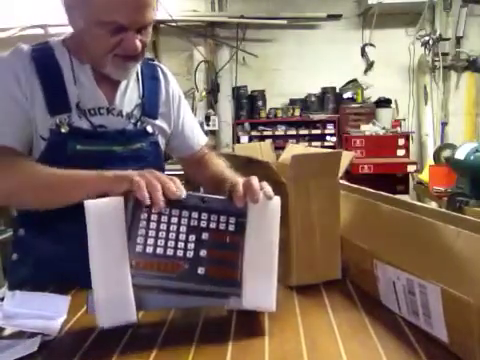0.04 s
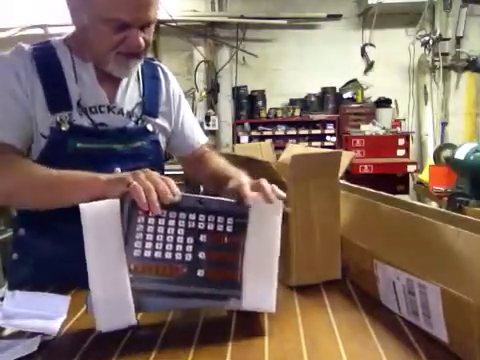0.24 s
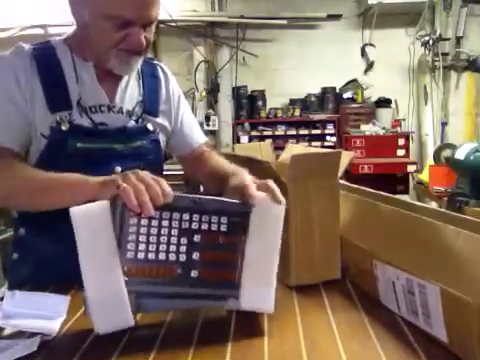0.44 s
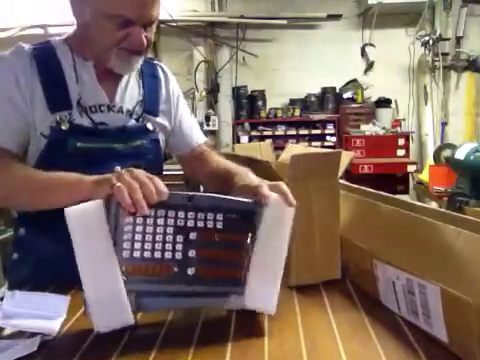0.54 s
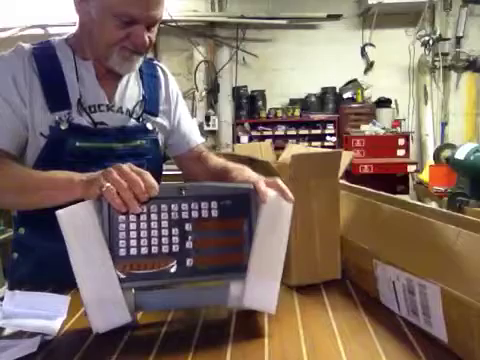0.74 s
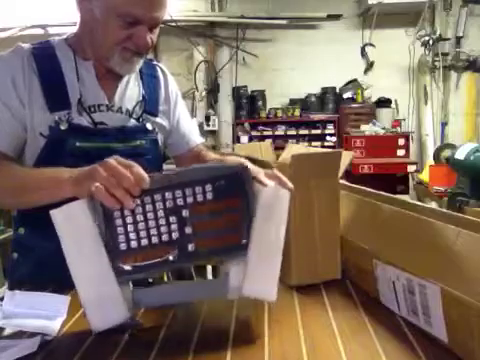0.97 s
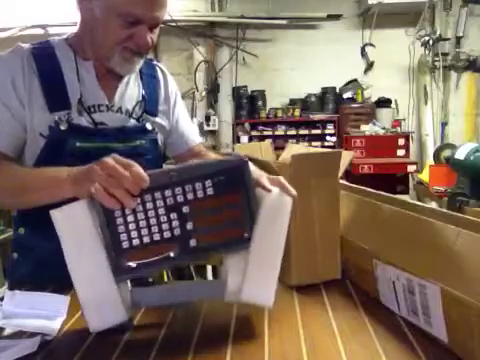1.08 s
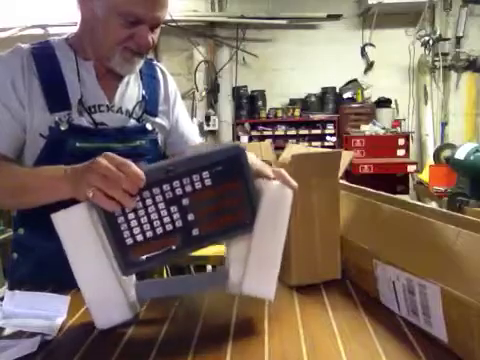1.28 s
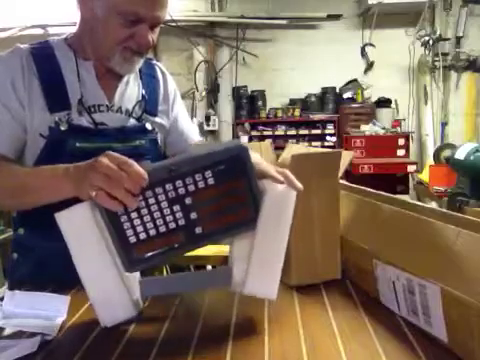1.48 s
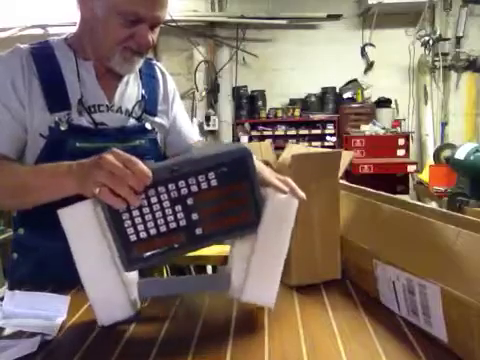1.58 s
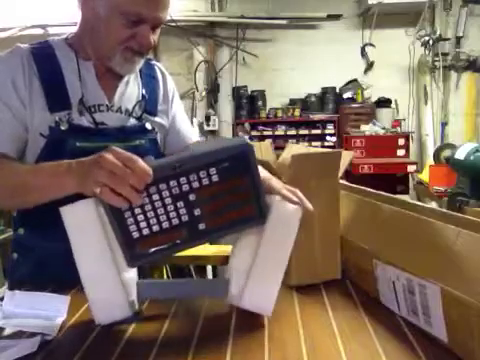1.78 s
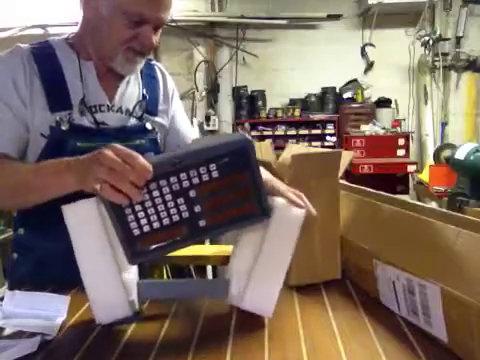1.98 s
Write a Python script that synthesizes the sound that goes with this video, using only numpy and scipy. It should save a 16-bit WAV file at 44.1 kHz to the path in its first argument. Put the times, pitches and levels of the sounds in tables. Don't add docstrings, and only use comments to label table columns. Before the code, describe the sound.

Packing foam rustles and scrapes as a hard case is worked loose; after a second it knocks loudly, slides with creaks and low thuds, then fades to faint rubbing in a small room, heard through a bass-light camera microphone.

```python
import sys
import numpy as np
from scipy import signal
from scipy.fft import rfft, irfft, next_fast_len
from scipy.io import wavfile
from scipy.ndimage import uniform_filter1d, map_coordinates

SR = 44100
rng = np.random.default_rng(int(sys.argv[2]) if len(sys.argv) > 2 else 0)


def digitize_waveform(pressure):
    field = np.atleast_2d(pressure).T
    bounded = np.clip(field, -1, 1)
    quanta = np.round(bounded * 32767).astype(np.int16)
    wavfile.write(sys.argv[1], SR, quanta)


def gain_from_decibels(decibels):
    exponent = np.asarray(decibels, float) / 20
    return 10 ** exponent


N = 89082
T = np.arange(N) / SR
HIT_T = np.arange(SR // 3) / SR


def unit(x):
    return x / np.sqrt(np.mean(x ** 2) + 1e-20)


def along(points, hz):
    f, v = np.transpose(points)
    return np.interp(np.log(hz + 1), np.log(f + 1), v)


def wobble(knots_per_s):
    knots = rng.standard_normal(int(N * knots_per_s / SR) + 4)
    return map_coordinates(knots, [T * knots_per_s])


def filtered(x, response):
    m = next_fast_len(len(x) + SR // 2)
    return irfft(rfft(x, m) * response(np.fft.rfftfreq(m, 1 / SR)), m)[:len(x)]


def coloured(x, spectrum):
    return unit(filtered(x, lambda f: gain_from_decibels(along(spectrum, f))))


def peak(f, hz, width_hz):
    return 1j * f * width_hz / (hz * hz - f * f + 1j * f * width_hz)


def soft(f, hz):
    return 1 / (1 - (f / hz) ** 2 + 1.4j * f / hz)


def add_at(out, start_s, x):
    out[round(start_s * SR):][:len(x)] += x


def grains(rate_per_s, spread_db):
    chance, side, size = rng.random((3, N))
    clicks = (chance < rate_per_s / SR) * np.sign(side - .5)
    return unit(clicks * gain_from_decibels(-spread_db * np.log(size + 1e-4)))


# peak in s, rise in s, fall in s, coarse rasp in dB, fine hiss in dB.
STROKES = [(0, .03, 0.043, -57, -57.5), (.15, 0.014, 0.025, -51.5, -58), (.22, 0.054, 0.13, -51.5, -53),
           (.335, 0.022, 0.055, -46, -52.5), (0.359, 0.023, 0.019, -53.5, -44.5),
           (.42, 0.048, .05, -60.5, -58.5), (.47, .03, 0.036, -52.5, -55), (.51, 0.028, 0.049, -45.5, -50),
           (0.549, 0.053, 0.058, -43.5, -47), (.64, 0.051, 0.024, -58, -61.5),
           (.715, 0.051, 0.078, -50, -57.5), (.765, 0.04, 0.058, -52.5, -53.5),
           (0.767, 0.0023, 0.0076, -47, -55), (.91, 0.067, 0.14, -55.5, -62),
           (1.01, 0.062, 0.11, -47.5, -49), (1.099, 0.086, 0.12, -44, -58), (1.26, 0.12, 0.09, -48, -59),
           (1.359, 0.031, 0.025, -49.5, -50), (1.4, 0.08, 0.052, -51, -63), (1.585, .05, 0.057, -61, -62),
           (1.65, 0.08, 0.062, -59.5, -64), (1.76, 0.068, 0.054, -48, -55.5),
           (1.919, 0.021, 0.047, -63.5, -59), (2.02, 0.067, .03, -55, -62)]
# frequency in Hz, density in dB per Hz.
RASP_SPECTRUM = [(150, -18), (400, -1), (900, 2.5), (1600, -0.5), (3100, -6), (6500, -17), (9000, -22.5),
                 (15500, -34)]
# frequency in Hz, density in dB per Hz.
HISS_SPECTRUM = [(500, -39), (2500, -0.5), (6000, 1), (10000, -3), (15500, -5.5)]


def foam():
    grains_per_s, grain_spread_db, grain_share = 4500, 2.5, 0.53
    patch_db, unsteady_db = 0.8, 0.73
    power = np.zeros((2, N))
    for peak_s, rise_s, fall_s, *db in STROKES:
        span = np.where(T < peak_s, rise_s, fall_s)
        power += gain_from_decibels(db)[:, None] ** 2 * np.exp(-2 * ((T - peak_s) / span) ** 2)
    out = np.zeros(N)
    for swell, spectrum in zip(np.sqrt(power), (RASP_SPECTRUM, HISS_SPECTRUM)):
        grit = grain_share * grains(grains_per_s, grain_spread_db) + rng.standard_normal(N)
        out += swell * coloured(grit, spectrum)
    z = signal.stft(out, nperseg=512)[2]
    patches = uniform_filter1d(rng.standard_normal(z.shape), 6, 0)
    patches = unit(uniform_filter1d(patches, 6, 1))
    patchy = signal.istft(z * gain_from_decibels(patch_db * patches), nperseg=512)[1][:N]
    return patchy * gain_from_decibels(unsteady_db * wobble(45.2))


def rubbed_bands(table, edge_s, steady):
    out = np.zeros(N)
    for start_s, end_s, hz, width_hz, db in table:
        a, n = round(start_s * SR), round((end_s - start_s) * SR)
        band = filtered(rng.standard_normal(SR // 2), lambda f: peak(f, hz, width_hz) ** 2)
        band = signal.hilbert(band)
        tone = (band / (np.abs(band) + 1e-9) ** steady).real
        tone = unit(tone[SR // 10:])
        gate = np.clip(np.minimum(T[:n], end_s - start_s - T[:n]) / edge_s, 0, 1)
        out[a:a + n] += (gain_from_decibels(db) * gate * tone[:n])[:N - a]
    return out


# start in s, end in s, centre in Hz, width in Hz, level in dB.
RUBS = [(.15, 0.474, 350, 450, -58), (1.5, 1.84, 405, 520, -59), (.135, 0.17, 1900, 800, -45),
        (1.675, 1.81, 1000, 940, -52), (1.91, 2.03, 1160, 700, -60.5), (.3, 0.43, 1700, 1500, -62),
        (.49, 0.617, 1300, 1250, -53), (.5, .6, 3130, 1500, -47), (.69, 0.81, 1420, 400, -56),
        (.28, 0.47, 108, 35, -64), (0, 0.044, 300, 400, -60), (.6, .86, 270, 570, -59.5),
        (1.84, 2.03, 370, 370, -64), (.14, .3, 2940, 490, -60), (1.15, 1.33, 5100, 2700, -57)]


def rubs():
    return rubbed_bands(RUBS, edge_s=.03, steady=0)


# frequency in Hz, density in dB per Hz.
AIR_SPECTRUM = [(55, -40), (80, -22), (120, -6), (270, -9), (861, -17.5), (3250, -24), (11500, -30.5),
                (15500, -29)]


def air():
    return gain_from_decibels(-60.5 + 0.3 * wobble(6.2)) * coloured(rng.standard_normal(N), AIR_SPECTRUM)


def hard_contact(modes):
    ring = np.zeros(len(HIT_T))
    for hz, db, t60_s in modes:
        build_up = 1 - np.exp(-HIT_T * hz / 0.46)
        ring += gain_from_decibels(db - 60 * HIT_T / t60_s) * np.sin(2 * np.pi * hz * HIT_T) * build_up
    return -ring * (1 - np.exp(-HIT_T / .0003))


# frequency in Hz, level in dB, t60 in s.
TAP_MODES = [(375.3, -2.5, 0.23), (657, 3, 0.05), (1035, -7, 0.088), (1330, 3, 0.05), (1710, -3, 0.097),
             (1970, -8.5, 0.058)]


def bench_tap():
    out = np.zeros(N + SR)
    add_at(out, .1277, gain_from_decibels(-38.5) * hard_contact(TAP_MODES))
    return out[:N]


def crack():
    burst = rng.standard_normal(len(HIT_T)) * gain_from_decibels(-60 * HIT_T / .015)
    return filtered(burst, lambda f: peak(f, 3500, 4000) * soft(f, 7000) ** 2)


TICKS_S = [
    .128,
    .7655,
    .911,
    1.403,
]
TICKS_DB = [-46, -31, -43, -40]


def ticks():
    out = np.zeros(N + SR)
    for start_s, db in zip(TICKS_S, TICKS_DB):
        add_at(out, start_s, gain_from_decibels(db) * crack())
    return out[:N]


# frequency in Hz, width in Hz, level in dB.
CASE_MODES = [(151, 52, -10), (200, 14.8, 0), (252.8, 11, 2.5), (348.6, 19.6, 5), (463.6, 9.6, -1.5),
              (618.3, 16.2, 1), (702, 37, -10.5), (806, 47, -11), (955, 11, -8), (1143, 26, -9),
              (1363, 32, -8.5), (1740, 115, -11), (2400, 500, -8), (3050, 180, -2.5)]


def case(f):
    return sum((-1) ** k * gain_from_decibels(db) * peak(f, hz, width_hz)
               for k, (hz, width_hz, db) in enumerate(CASE_MODES))


THUDS_S = [.138, .151, .165, .684, .715, .8625, .9095, .9865, .9935, 1.0025, 1.008, 1.022, 1.031, 1.043,
           1.0795, 1.0845, 1.0905, 1.112, 1.212, 1.301, 1.381, 1.389, 1.414, 1.63, 1.76]
# peak in dB, t60 in s, contact hardness in Hz, favoured mode in Hz.
THUDS = [(-37, 0.2, 1300, 400), (-38.5, 0.07, 850, 390), (-39.5, 0.11, 530, 275), (-43, 0.41, 500, 390),
         (-42.5, 0.14, 430, 170), (-36.5, 0.72, 690, 320), (-42, 0.12, 1200, 800), (-30, 0.34, 840, 660),
         (-30, 0.1, 760, 450), (-31, .15, 810, 300), (-35, .12, 1200, 390), (-35, .08, 1100, 820),
         (-35, .06, 1100, 1000), (-32, .06, 1600, 680), (-17, 0.049, 840, 660), (-20, .051, 1470, 650),
         (-22, .07, 780, 530), (-27.5, .068, 1040, 500), (-31.5, 0.12, 570, 270), (-31, 0.058, 520, 390),
         (-30, 0.056, 890, 650), (-29.5, 0.12, 850, 360), (-36, 0.11, 910, 490), (-47, 0.52, 490, 340),
         (-43.5, .052, 240, 160)]


def thuds():
    out = np.zeros(N + SR)
    for start_s, (db, t60_s, hard_hz, own_hz) in zip(THUDS_S, THUDS):
        chatter = .022 * np.clip(HIT_T / .006, 0, 1)
        push = chatter * rng.standard_normal(len(HIT_T)) * gain_from_decibels(-60 * HIT_T / t60_s)
        push[0] = -1

        def body(f):
            modes = case(f) + 0.5 * peak(f, own_hz, 0.65 * own_hz)
            return modes * soft(f, 1.71 * hard_hz) ** 2

        ring = filtered(push, body) * gain_from_decibels(-40 * HIT_T / t60_s)
        add_at(out, start_s, gain_from_decibels(db) * ring / np.abs(ring).max())
    return out[:N]


# start in s, end in s, pitch in Hz, width in Hz, level in dB.
SQUEAKS = [(1.105, 1.16, 2900, 94, -46), (1.16, 1.225, 2990, 150, -52), (1.245, 1.335, 2420, 190, -52.5),
           (1.335, 1.39, 2500, 200, -53), (1.385, 1.44, 2900, 89, -63), (1.083, 1.097, 3520, 130, -42),
           (1.37, 1.4, 2950, 80, -56), (0.18, 0.205, 6300, 300, -61), (.45, .63, 382, 39, -57.5),
           (.865, .96, 230, 34, -57.5), (1.72, 1.85, 256, 21, -55), (1.725, 1.79, 1600, 41, -53.5),
           (.71, .76, 133, 70, -58.5), (1.2, 1.35, 965, 46, -52), (.33, .4, 790, 54, -55.5),
           (1.1, 1.2, 960, 36, -48), (1.33, 1.468, 350, 35, -46.5), (1.1, 1.155, 2200, 90, -54),
           (1.115, 1.17, 460, 26, -44), (1.39, 1.455, 590, 56, -52.5), (1.4, 1.475, 253, 38, -49),
           (1.25, 1.3, 345, 35, -45.5), (.173, .188, 1750, 120, -47), (1.95, 2.03, 697, 140, -60),
           (1.485, 1.53, 255, 36, -56), (1.87, 2.03, 320, 29, -66.5), (1.6, 1.66, 250, 27, -61.5),
           (1.3, 1.315, 230, 60, -37), (1.088, 1.104, 340, 50, -28.5), (1.28, 1.3, 3800, 300, -64),
           (1.435, 1.47, 487, 55, -49)]


def squeaks():
    return rubbed_bands(SQUEAKS, edge_s=.008, steady=.68)


# frequency in Hz, level in dB, t60 in s.
KNOCK_MODES = [(200, -1.5, 0.069), (354, 2.5, 0.075), (460, 12.5, 0.02), (670, 2, 0.043), (739, 1.5, 0.066),
               (940, 0, 0.077), (1417, 2.5, 0.024), (1780, -6.5, 0.064), (2240, -12.5, 0.096),
               (2440, -13.5, 0.14), (2953, 0.5, 0.028), (3090, -11, 0.032), (4280, -23, 0.07),
               (5170, -26, 0.038)]


def knock():
    out = np.zeros(N + SR)
    knock_s, blow_s, blow_hz = 1.0623, 1.0625, 1300
    add_at(out, knock_s, gain_from_decibels(-21) * hard_contact(KNOCK_MODES))
    add_at(out, knock_s, gain_from_decibels(-24) * crack())
    impulse = 1. * (HIT_T == 0)
    blow = filtered(impulse, lambda f: peak(f, blow_hz, 3 * blow_hz) * soft(f, 3300) ** 2)
    add_at(out, blow_s, -gain_from_decibels(-16) * blow / blow.max())
    return out[:N]


# time in s, level in dB.
DRAG = [
    (1.073, -28),
    (1.11, -36.5),
    (1.17, -40.5),
    (1.25, -42),
    (1.36, -41),
    (1.419, -40),
    (1.461, -53.5),
    (1.472, -55),
    (1.53, -76),
]


def drag():
    slips = filtered(grains(rate_per_s=1600, spread_db=2.2),
                     lambda f: (case(f) + 0.059 * peak(f, 970, 2100)) * soft(f, 900))
    time_s, db = np.transpose(DRAG)
    return unit(slips) * gain_from_decibels(np.interp(T, time_s, db, -120, -120))


# frequency in Hz, t60 in s.
SHOP_DECAY = [(200, 0.19), (1500, 0.45), (8000, 0.48)]


def shop(x):
    hz, t, z = signal.stft(rng.standard_normal(SR // 2), SR, nperseg=256)
    decay = gain_from_decibels(-60 * t / along(SHOP_DECAY, hz)[:, None])
    tail = signal.istft(z * decay, SR, nperseg=256)[1]
    late = np.pad(x, (300, 0))
    return signal.fftconvolve(late, tail / np.linalg.norm(tail))[:N]


def scene():
    near = foam() + rubs() + bench_tap() + ticks() + thuds() + squeaks() + knock() + drag()
    wet_db = -11
    return (near + gain_from_decibels(wet_db) * shop(near) + air())[None]


def low_pass(x):
    return signal.sosfilt(signal.butter(12, 15380, fs=SR, output="sos"), x)


def record(dry):
    low_cut_hz, rumble_db, top_hz = 112, -99, 15370

    def bass_cut(f):
        return (1 - soft(f, low_cut_hz) * (1 + 1.4j * f / low_cut_hz)) ** 4

    rumble = unit(filtered(rng.standard_normal(N), lambda f: soft(f, 60) ** 2))
    mix = filtered(dry[0], bass_cut) + gain_from_decibels(rumble_db) * rumble
    mix = filtered(mix, lambda f: f < top_hz)
    return low_pass(mix[None])


dry = scene()
out = record(dry)
digitize_waveform(out)
```